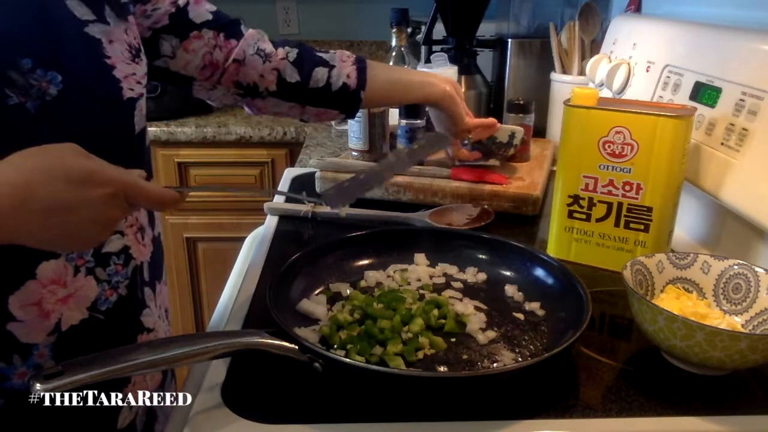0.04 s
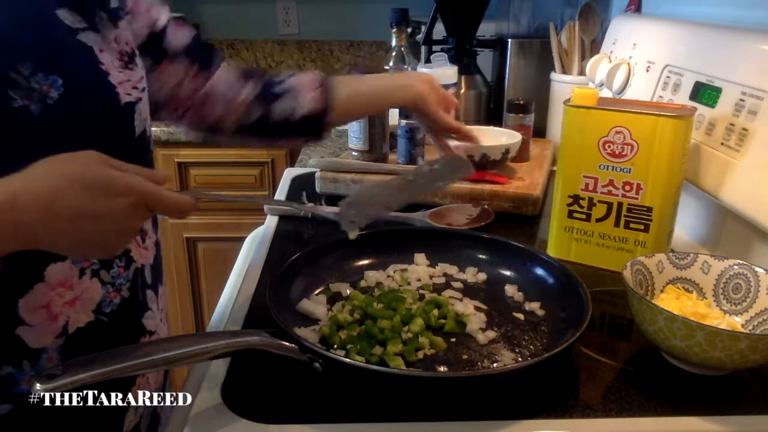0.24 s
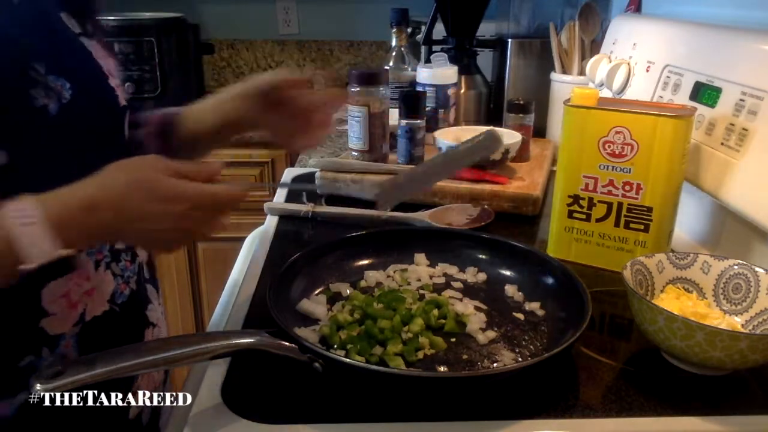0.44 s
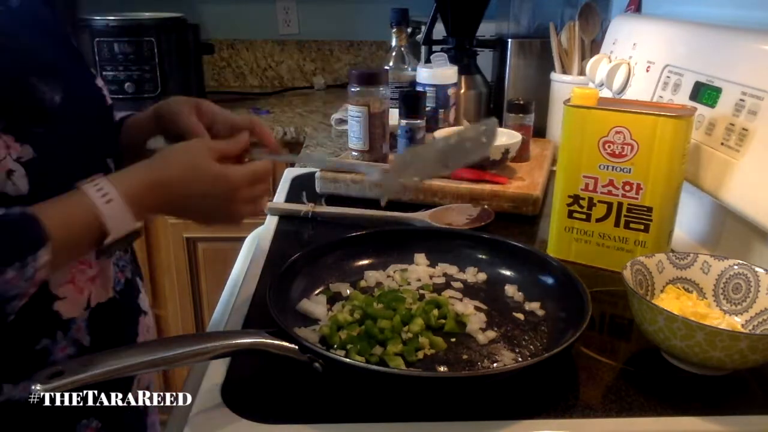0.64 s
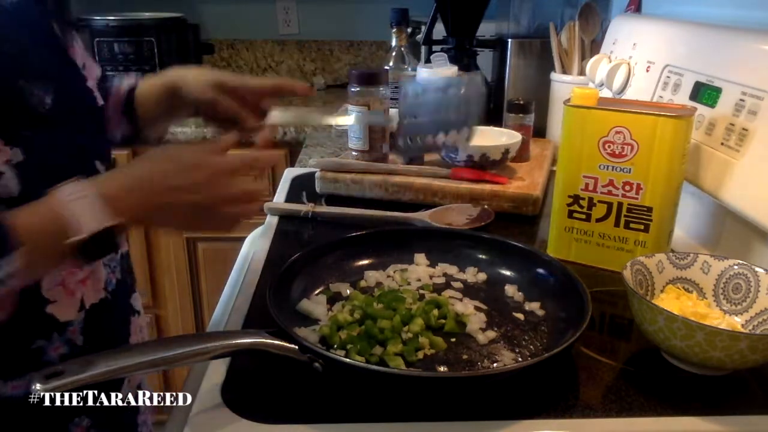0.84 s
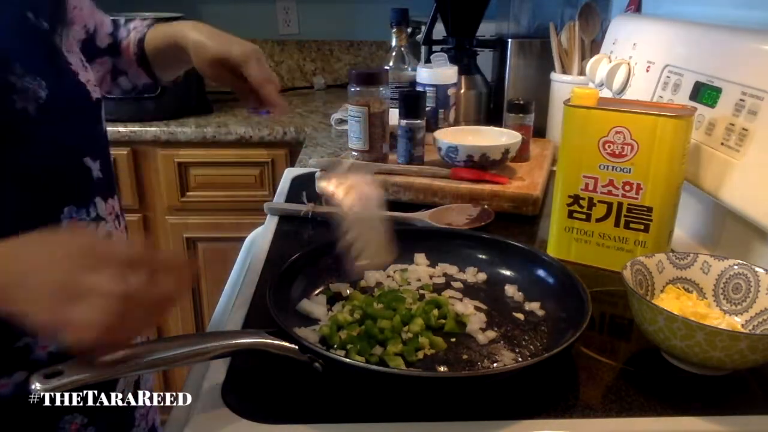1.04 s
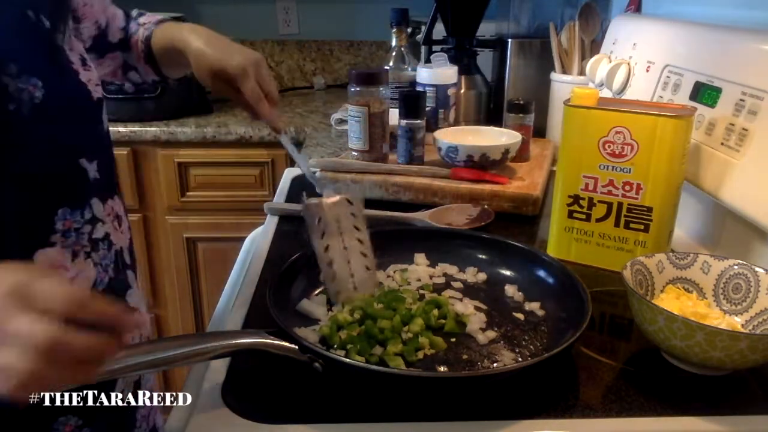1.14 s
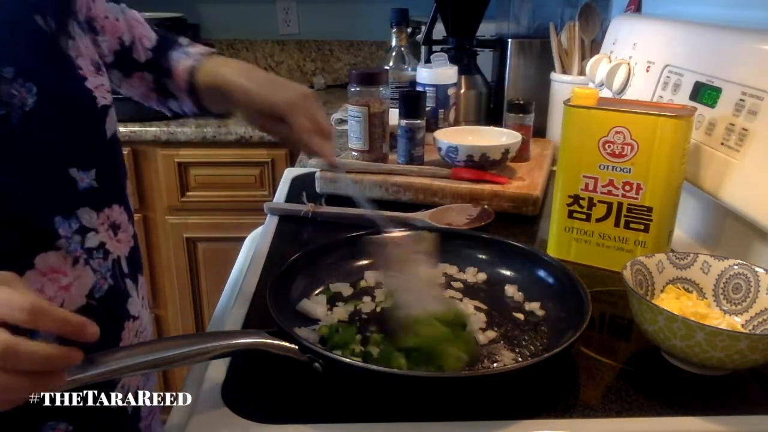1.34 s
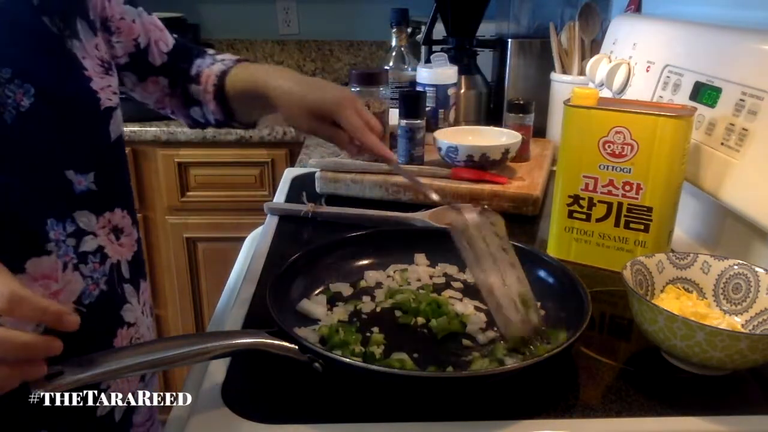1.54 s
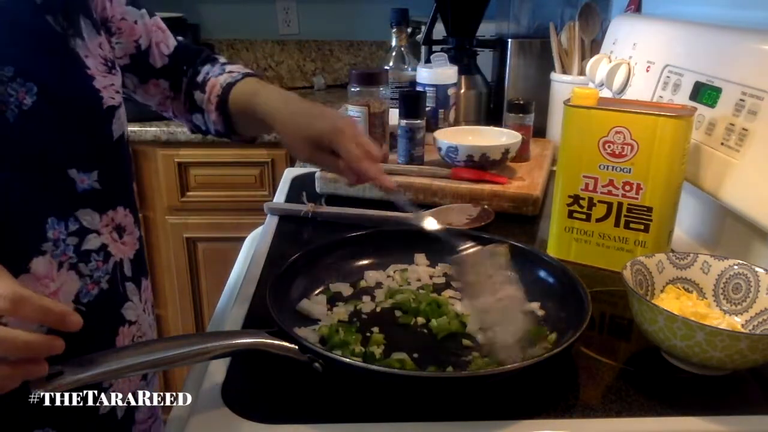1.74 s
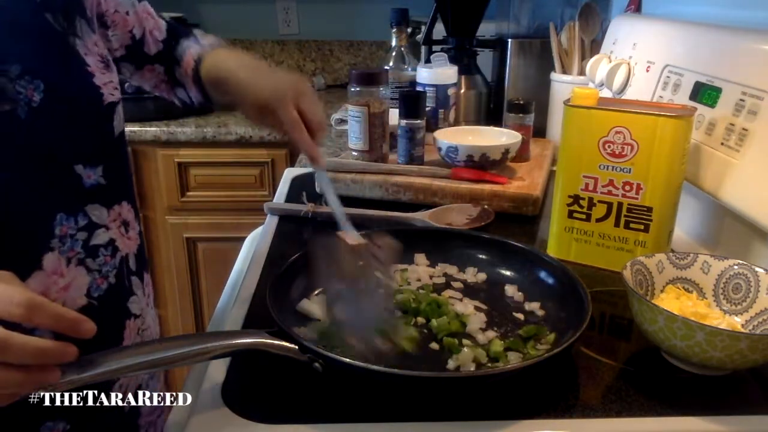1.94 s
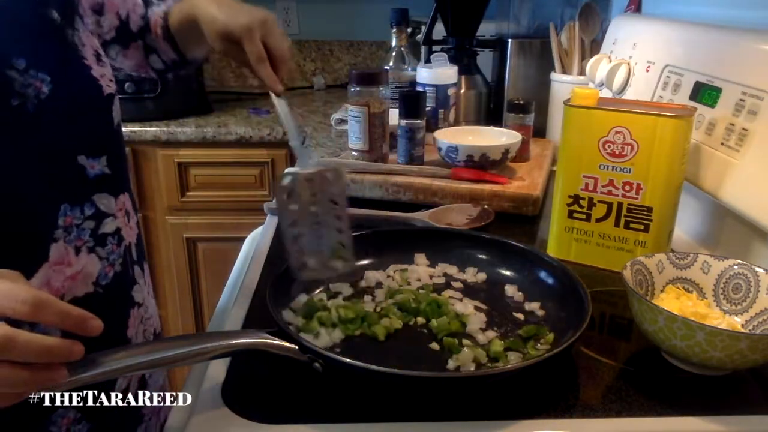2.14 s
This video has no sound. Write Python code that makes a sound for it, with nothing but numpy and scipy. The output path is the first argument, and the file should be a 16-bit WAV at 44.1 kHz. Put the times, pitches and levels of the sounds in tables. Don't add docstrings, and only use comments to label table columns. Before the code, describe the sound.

A metal spatula hits a frying pan twice with hard, short clanks and a gritty scrape, following an earlier wooden knock; faint sizzling runs throughout in a small kitchen, close microphone distorting on the loudest blows.

```python
import sys
import numpy as np
from scipy import signal
from scipy.fft import rfft, irfft
from scipy.io import wavfile

SR = 44100
rng = np.random.default_rng(int(sys.argv[2]) if len(sys.argv) > 2 else 0)


def attenuation_scalar(level_db):
    decades = np.asarray(level_db, float) / 20
    return 10 ** decades


def dump_mix(stems):
    frames = np.atleast_2d(stems).T
    limited = np.clip(frames, -1, 1)
    pcm = np.round(limited * 32767).astype(np.int16)
    wavfile.write(sys.argv[1], SR, pcm)


N = 97020


def rms_one(x):
    return x / np.sqrt(np.mean(x ** 2) + 1e-20)


def curve(rows):
    return np.interp(np.arange(N) / SR, *np.transpose(rows))


def at_hz(points, hz):
    f, value = np.transpose(points)
    return np.interp(np.log(hz + 1), np.log(f), value)


def drift(rate):
    r = np.exp(-80 * np.pi * rate / SR)
    slow = signal.lfilter([1], [1, -2 * r, r * r], rng.standard_normal(N // 40 + 2002))[2000:]
    return np.interp(np.arange(N) / 40, np.arange(len(slow)), rms_one(slow))


def ring(x, hz, t60):
    r, w = attenuation_scalar(-60 / (t60 * SR)), 2 * np.pi * hz / SR
    return signal.lfilter([0, np.sin(w)], [1, -2 * r * np.cos(w), r * r], x + 1e-18)


def colour(x, spectrum):
    gain = attenuation_scalar(at_hz(spectrum, np.fft.rfftfreq(N, 1 / SR)))
    return rms_one(irfft(rfft(x) * gain, N))


def grains(rate, spread):
    sizes = attenuation_scalar(spread * np.minimum(rng.exponential(1, N), 5)) * rng.choice([-1, 1], N)
    return rms_one(sizes * (rng.random(N) < rate / SR))


def clicks(rows):
    out = np.zeros(N)
    out[[int(s * SR) for s, _ in rows]] = [attenuation_scalar(db) for _, db in rows]
    return out


def burst(s, t60, rise=0.00063):
    t = np.maximum(np.arange(N) / SR - s, 0)
    fall_db = -60 * np.maximum(t - rise, 0) / t60
    return np.minimum(t / rise, 1) ** 2 * attenuation_scalar(np.maximum(fall_db, -300))


def hollow(rows):
    out = np.zeros(N)
    for s, hz, db, t60, dying in rows:
        out += attenuation_scalar(db) * burst(s, dying, 0.00059) * rms_one(ring(rng.standard_normal(N), hz, t60))
    return out


def pan():
    # t/s, level/dB, rattle t60/s, brightness/dB, blade ring/dB
    hits = [
        (1.2615, -1.5, 0.08, -1.5, -7),
        (1.307, -15.5, 0.16, -4.5, -22),
        (1.862, -2.5, 0.065, -3, -36),
        (1.879, -23.5, 0.12, 6, -23),
    ]
    # t/s, level/dB
    scrape = [(1.871, -21), (1.89, -13.5), (1.905, -20), (1.925, -12.5), (1.948, -12.5), (1.958, -28),
              (1.99, -57.5)]
    # f/Hz, level/dB, t60/s
    pan_modes = [(975, -12, 0.28), (1536, -7.5, 0.024), (2073, -6.5, 0.025), (2565, -4, 0.17),
                 (3390, 0, 0.079), (3449, 3, 0.038), (4287, -6.5, 5.0), (4880, -3.5, 0.013)]
    # f/Hz, level/dB
    pan_skin = [(200, -29), (500, -4), (900, -11.5), (2500, 3.5), (3000, -6), (3500, 8.5), (5150, 2),
                (5700, -27.5)]
    # f/Hz, level/dB, t60/s
    blade_modes = [(6220, -1, 0.014), (6970, 0.5, 0.0086), (8400, -6, 0.0061), (9945, -5.5, 0.022),
                   (10800, -9, 0.0082), (12400, 5, 0.0075), (13600, -11, 0.0074), (15200, -14.5, 0.011)]
    # f/Hz, level/dB, t60/s
    drag_modes = [(6100, -6, 0.033), (6980, -0.5, 0.015), (8260, -3, 0.035), (9300, -18, 0.014),
                  (11000, -12, .012), (13100, -12, 0.012)]
    scrape_db, scrape_blade_db, skin_db = -7, -11.5, -5
    longest_s = .022
    grain_s = .0015

    rub = signal.lfilter([1], [1, -np.exp(-1 / (grain_s * SR))], abs(grains(12000, spread=1.0)))
    first, last = scrape[0][0], scrape[-1][0]
    pressure_db = curve([(first - .008, -120)] + scrape + [(last + 0.048, -80)])
    drag = attenuation_scalar(scrape_db + pressure_db) * rms_one(rub)
    low = drag + sum(attenuation_scalar(db - tilt_db) * burst(s, t60) for s, db, t60, tilt_db, _ in hits)
    high = drag + sum(attenuation_scalar(db + tilt_db) * burst(s, t60) for s, db, t60, tilt_db, _ in hits)
    top = sum(attenuation_scalar(db + top_db) * burst(s, .45 * t60) for s, db, t60, _, top_db in hits)

    def struck(noise):
        dull = signal.sosfilt(signal.butter(2, 1800, fs=SR, output="sos"), noise)
        return low * dull + high * (noise - dull)

    drive = struck(rng.standard_normal(N))
    body, blade = np.zeros(N), np.zeros(N)
    for k, (hz, db, t60) in enumerate(pan_modes):
        body += attenuation_scalar(db - 26.0) * ring(drive, hz, min(t60, longest_s)) * (-1) ** k
    for hz, db, t60 in blade_modes:
        blade += attenuation_scalar(db - 20.5) * ring(top * rng.standard_normal(N), hz, t60)
    dragging = drag > attenuation_scalar(-70)
    for hz, db, t60 in drag_modes:
        blade += attenuation_scalar(db - 24 + scrape_blade_db) * ring(drive * dragging, hz, t60)
    blade = signal.sosfilt(signal.butter(2, 5000, "high", fs=SR, output="sos"), blade)
    skin = struck(colour(rng.standard_normal(N), pan_skin))
    return body + blade + attenuation_scalar(skin_db) * skin


def touches():
    # t/s, level/dB
    contacts = [
        (1.2617, 1),
        (1.8628, 2),
        (1.8995, -14),
    ]
    return -ring(clicks(contacts), 2477, .0012)


def board():
    # t/s, level/dB, rattle t60/s, ringing/dB
    knocks = [
        (0.323, -34.5, 0.31, -10.5),
        (0.2189, 0, 0.058, -7),
        (0.249, -22, 0.065, -6),
        (0.267, -10.5, 0.11, -16.5),
        (0.3, -26, 0.08, -8.5),
        (1.1605, -23, 0.044, -46),
    ]
    # f/Hz, level/dB, t60/s
    wood_modes = [(590.5, -19, 1), (725, 6, 0.99), (988, 5.5, 0.54), (1021, 0.5, 0.44), (1080, 0, 0.99),
                  (1234, -5, 1), (1314, -6.5, 0.85), (1400, -17, 0.29), (1480, 3, 0.2), (1650, -4.5, 0.92),
                  (1922, -5.5, 0.32), (1969, -6, 0.2), (2350, 16, 0.15), (2830, 3.5, 0.14)]
    # f/Hz, level/dB
    wood_skin = [(180, -59), (300, -15.5), (430, -25), (704, -9.5), (1390, -5.5), (1550, -2.5),
                 (2420, -12.5), (3300, -32), (4290, -49.5), (7260, -120)]
    damp, cut_hz, crack_db = .14, 3470, -1.5

    rattle = sum(attenuation_scalar(db + ring_db) * burst(s, t60) for s, db, t60, ring_db in knocks)
    drive = rattle * rng.standard_normal(N)
    body = sum(attenuation_scalar(db - 27.5) * ring(drive, hz, damp * t60) for hz, db, t60 in wood_modes)
    crack = sum(attenuation_scalar(db) * burst(s, t60) for s, db, t60, _ in knocks)
    crack = crack * colour(rng.standard_normal(N), [(100, -42.5)] + wood_skin)
    dull = signal.cheby2(8, 50, cut_hz * 1.09, fs=SR, output="sos")
    return signal.sosfilt(dull, body + attenuation_scalar(crack_db) * crack)


def after_rings():
    # t/s, f/Hz, level/dB, ring t60/s, dying t60/s
    bodies = [
        (0.2223, 1172, -16.5, 0.028, 0.33),
        (0.2195, 692, -28, 0.022, 0.18),
        (1.164, 870, -27.5, 0.0083, 0.092),
        (1.262, 875, -15, .025, 0.063),
        (1.864, 953, -12, 0.015, 0.066),
        (1.863, 245, -31, 0.1, 0.44),
        (1.931, 2220, -24.5, 0.031, 0.055),
    ]
    return hollow(bodies)


def stove():
    # t/s, level/dB
    thuds = [(0.001, -40.5), (0.132, -48), (0.2212, -26), (0.264, -28), (0.296, -29), (1.155, -25),
             (1.174, -31), (1.196, -30), (1.235, -34), (1.26, -21.5), (1.864, -25), (1.929, -38.5)]
    # f/Hz, level/dB, t60/s
    stove_modes = [(109.3, -25.5, 0.058), (159, 4, 0.064), (245, -9, 0.3), (299.4, -9, 0.25)]
    out = np.zeros(N)
    chance_db = rng.normal(0, 0.77, (len(thuds), len(stove_modes)))
    for k, (hz, mode_db, t60) in enumerate(stove_modes):
        pushes = [(s, db + mode_db + c) for (s, db), c in zip(thuds, chance_db[:, k])]
        out += ring(clicks(pushes), hz, t60) * (-1) ** k
    return out


def spits():
    # t/s, peak level/dB, pitch f/Hz, low body/dB, t60/s
    drops = [(0.0581, -27, 15500, -39.5, 0.018), (0.128, -32, 15500, -26, 0.025),
             (0.513, -30, 11460, -31, 0.022), (0.743, -19, 11310, -55, 0.022),
             (1.1763, -19, 14600, -18, 0.014), (1.2016, -25, 12400, -13, 0.04),
             (1.3583, -19.5, 11250, -30, 0.028), (1.481, -33, 15030, -25, 0.026),
             (1.4968, -22, 13600, -20, 0.019), (1.5705, -17, 12200, -30, 0.026),
             (1.655, -31, 13700, -23, 0.028), (1.7433, -25, 13700, -22.5, 0.021),
             (1.7626, -19.5, 15200, -32, 0.019), (1.8456, -31, 13700, -32, 0.02),
             (1.9036, -7, 11300, -44, 0.02), (1.9632, -26, 13360, -31, 0.022),
             (2.005, -24, 14800, -28, 0.025), (2.058, -20, 11300, -37, 0.022),
             (2.1, -25.5, 13900, -25, 0.014)]
    # f/Hz, level/dB, t60/s
    woken = [(1850, -4, .005), (3500, -14, .003), (5700, -7, .005), (8000, -12, .002)]
    glints_hz = [11300, 13510, 13700, 14600, 15350]
    rise_s, ring_s, tail_s = .003, .01, .08
    wide_db, tail_db, glint_spread_db = -13, -17, 8

    out, white = np.zeros(N), rng.standard_normal(N)
    bright = signal.sosfilt(signal.butter(4, [10500, 15800], "band", fs=SR, output="sos"), white)
    glints = np.array([rms_one(ring(white, hz, ring_s)) for hz in glints_hz])
    low = sum(attenuation_scalar(db) * rms_one(ring(white, hz, t60)) for hz, db, t60 in woken)
    chance = rng.normal(0, 1, (len(drops), len(glints)))
    for (s, db, hz, low_db, t60), c in zip(drops, chance):
        puff = attenuation_scalar(db - 6) * burst(s - .001, t60, rise_s)
        fizz = attenuation_scalar(db - 0.5 + tail_db) * burst(s, tail_s, rise_s)
        wide = bright + attenuation_scalar(glint_spread_db * c - 4.5) @ glints
        out += attenuation_scalar(-19.5) * ring(puff * white, hz, ring_s)
        out += (puff + fizz) * attenuation_scalar(wide_db) * wide
        out += puff * attenuation_scalar(low_db) * low
    return signal.sosfilt(signal.butter(4, 1400, "high", fs=SR, output="sos"), out)


def snaps():
    # t/s, level/dB
    cracks = [
        (1.5683, -11),
        (1.5692, -10),
        (1.5699, -8.5),
        (1.5705, -7.5),
        (1.5735, -22),
        (1.5765, -21),
    ]
    # f/Hz, level/dB, t60/s
    snap_modes = [(607, -28, 0.0094), (1170, -32, 0.013), (1820, -18.5, 0.012), (2130, -15.5, 0.0091),
                  (2780, -21, 0.012), (3800, -20.5, 0.0076), (5550, -20, 0.013), (7810, -17, .007),
                  (9900, -18, 0.0048), (11650, -2, 0.0055), (11900, 4, 0.0052), (13020, 0, 0.0052),
                  (14200, -10, .005), (14950, -9, .006)]
    out = np.zeros(N)
    for k, (hz, db, t60) in enumerate(snap_modes):
        out += attenuation_scalar(db) * ring(clicks(cracks), hz, t60) * (-1) ** k
    return out


def sizzle():
    # t/s, level/dB
    heat = [(0.0, -39.5), (0.32, -40), (0.87, -41), (0.99, -43.5), (1.21, -42), (1.36, -39), (1.79, -41),
            (1.97, -41.5), (2.2, -40)]
    # f/Hz, level/dB
    frying = [(1200, -53), (2000, -10.5), (5000, 4.5), (6500, 0), (8200, -1.5), (10500, 3), (14500, 3),
              (16000, 4)]
    # f/Hz, width/Hz, level/dB
    rim = [(2540, 450, -22.5), (3660, 600, -18.5), (4606, 1100, -15.5)]
    pops_per_s, spread_db, clump_db, pop_share = 8100, 3.0, 2.0, .6

    pops = grains(pops_per_s * attenuation_scalar(clump_db * drift(21)), spread_db)
    fizz = pop_share * pops + (1 - pop_share) * rng.standard_normal(N)
    tone = colour(fizz, frying)
    for hz, width, db in rim:
        tone = tone + attenuation_scalar(db) * rms_one(ring(fizz, hz, 3.1 / width))
    return attenuation_scalar(curve(heat) + .7 * drift(14)) * rms_one(tone)


def more_rings():
    # t/s, f/Hz, level/dB, ring t60/s, dying t60/s
    specks = [(0.235, 2830, -26, 0.05, 0.21), (0.297, 700, -19.5, 0.03, 0.11),
              (0.33, 1167, -30, 0.0147, 0.29), (1.01, 1940, -46, 0.0071, 0.025),
              (1.178, 12600, -40, .012, .05), (1.262, 5250, -17, 0.014, 0.11),
              (1.262, 3505, -5, 0.041, 0.04), (1.305, 7000, -33, 0.014, 0.093),
              (1.359, 13700, -29, .008, .03), (1.361, 11420, -31, .015, 0.053),
              (1.575, 13100, -34.5, 0.0085, 0.049), (1.6, 15200, -36, .008, .08),
              (1.905, 12300, -15, 0.0067, 0.033), (1.935, 1420, -29.5, 0.04, 0.15),
              (2.002, 13900, -36, .008, .04), (2.02, 14600, -36, .01, .06), (2.062, 14200, -37, .01, .04),
              (2.07, 14900, -38.5, .01, 0.067), (2.1, 2120, -43.5, 0.0095, .03),
              (0.001, 1020, -47.5, 0.0087, 0.33), (0.001, 620, -51.5, .008, 0.3),
              (0.222, 560, -20, .02, 0.12), (0.3, 1950, -41, .01, .2), (1.162, 900, -29, 0.0081, .06),
              (1.155, 135, -30, 0.067, 0.093), (1.262, 875, -19, 0.036, 0.066),
              (1.878, 4700, -17.5, 0.022, 0.19), (2.102, 13900, -42, 0.01, .04),
              (1.569, 590, -52.5, 0.026, 0.14)]
    return hollow(specks)


def room_air():
    # f/Hz, level/dB
    rumble = [(18, -30), (40, 10), (92, 1), (204, -4), (230, -26.5), (316, -2), (650, -26), (2000, -16.5),
              (2600, -31), (4400, -120)]
    return attenuation_scalar(-65.5) * colour(rng.standard_normal(N), rumble)


def kitchen(x):
    # f/Hz, t60/s
    room_t60 = [(100, 0.35), (500, 0.24), (1200, 0.21), (3000, 0.12), (8000, 0.18), (16000, 0.093)]
    gap_s = 0.00077
    t, echo = np.arange(SR // 2) / SR, 0
    edges = 62 * 2. ** np.arange(0, 8.1, .5)
    for low, high in zip(edges, edges[1:]):
        sos = signal.butter(2, [low, high], "band", fs=SR, output="sos")
        band = signal.sosfilt(sos, rng.standard_normal(len(t)))
        echo = echo + band * attenuation_scalar(-60 * t / at_hz(room_t60, np.sqrt(low * high)))
    echo = echo * (t > gap_s)
    return signal.fftconvolve(x, echo / np.sqrt(np.sum(echo ** 2)))[:N]


def scene():
    room_db, spit_room_db, snap_room_db = -9.5, 4, -9
    blows = pan() + touches() + board() + after_rings() + stove()
    drops, big_spit = spits(), snaps()
    sent = blows + attenuation_scalar(spit_room_db) * drops + attenuation_scalar(snap_room_db) * big_spit
    room = attenuation_scalar(room_db) * kitchen(sent)
    return (blows + drops + big_spit + room + sizzle() + more_rings() + room_air())[None]


def roll_off(x):
    return signal.sosfilt(signal.butter(12, 16660, fs=SR, output="sos"), x)


def record(dry):
    x = signal.sosfilt(signal.butter(4, 95, "high", fs=SR, output="sos"), dry)
    x = signal.sosfilt(signal.cheby2(14, 60, 16250, fs=SR, output="sos"), x)
    return roll_off(np.clip(x, -1.0, 1.0))


dry = scene()
out = record(dry)
dump_mix(out)
```